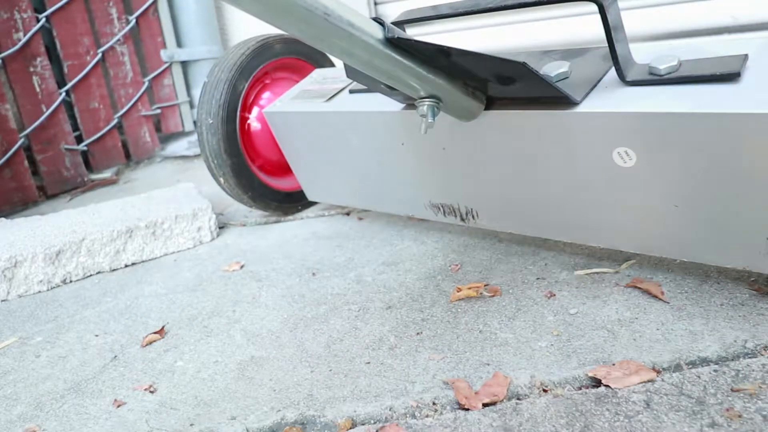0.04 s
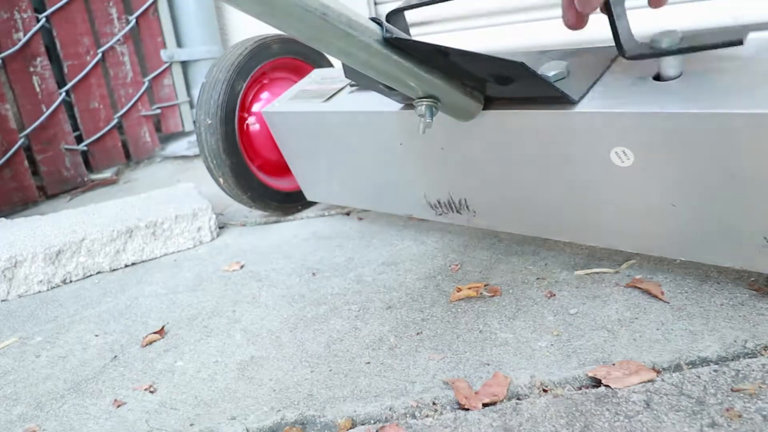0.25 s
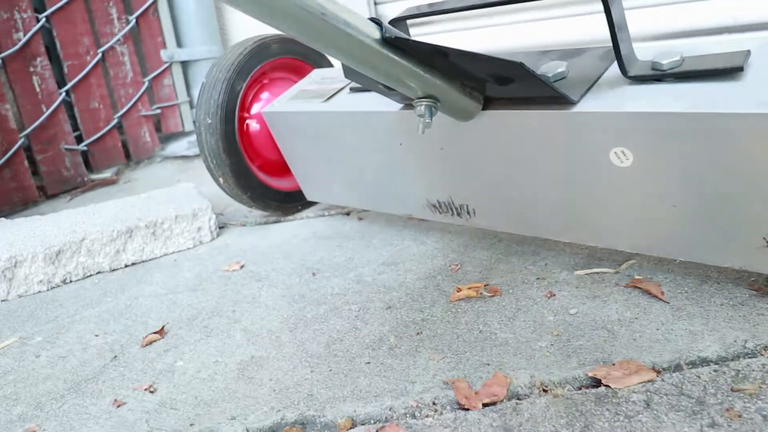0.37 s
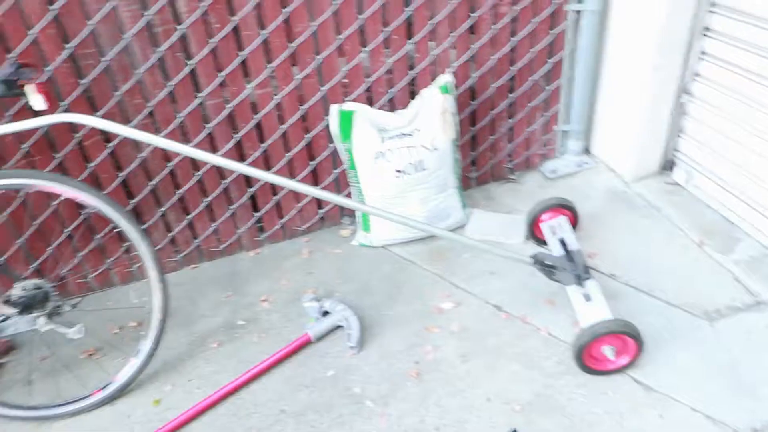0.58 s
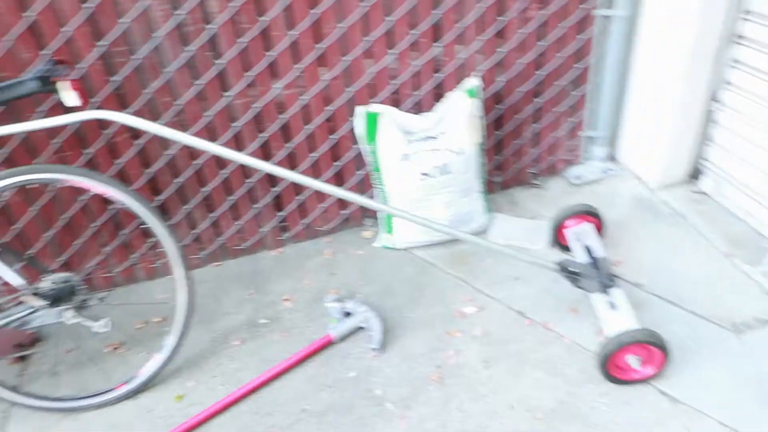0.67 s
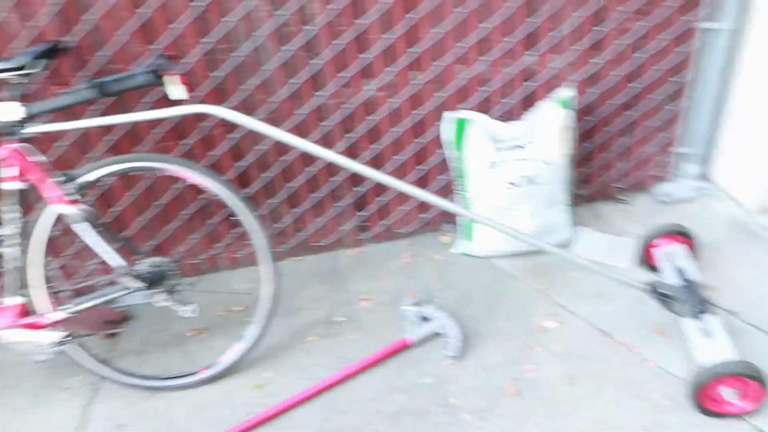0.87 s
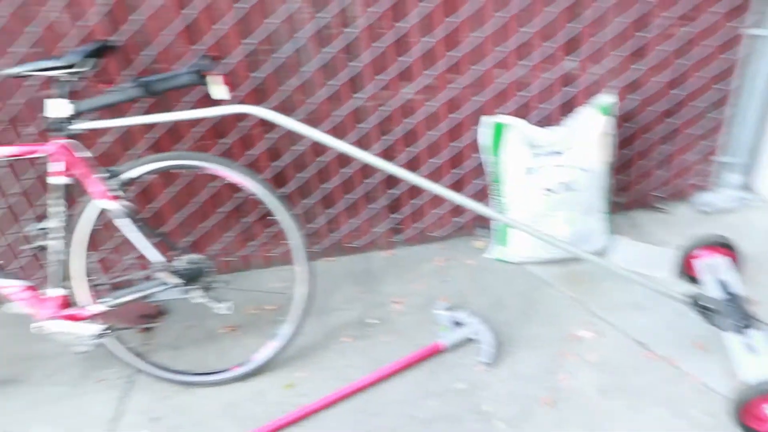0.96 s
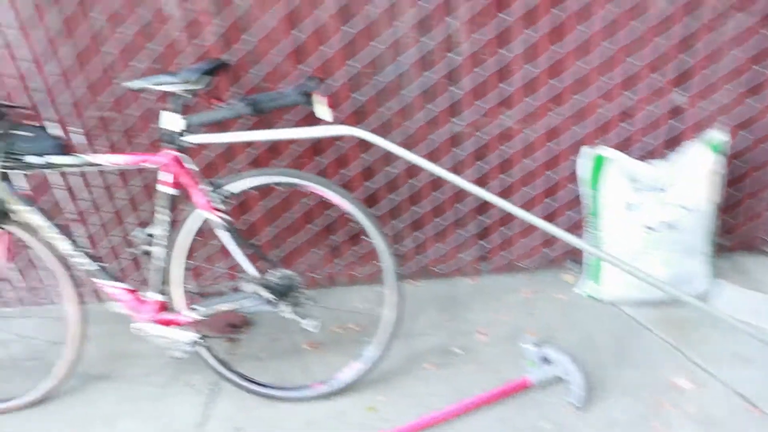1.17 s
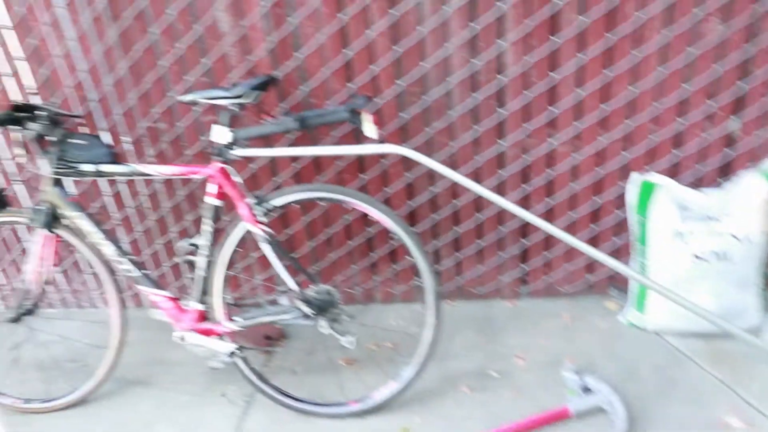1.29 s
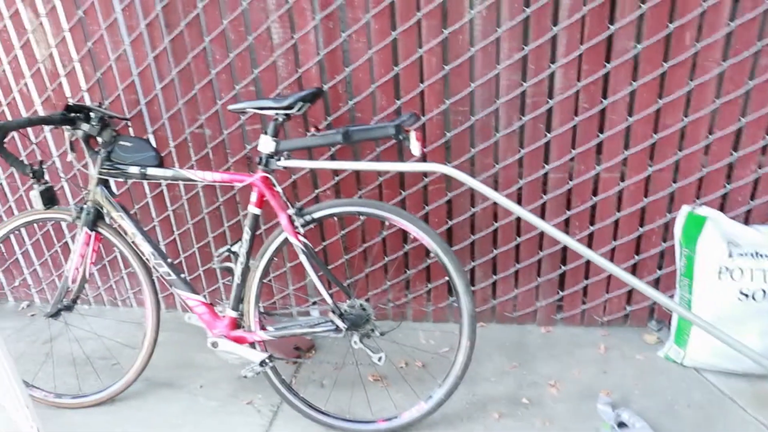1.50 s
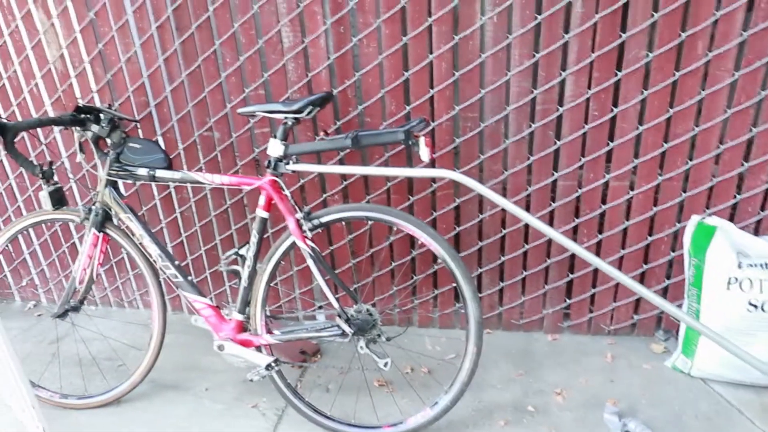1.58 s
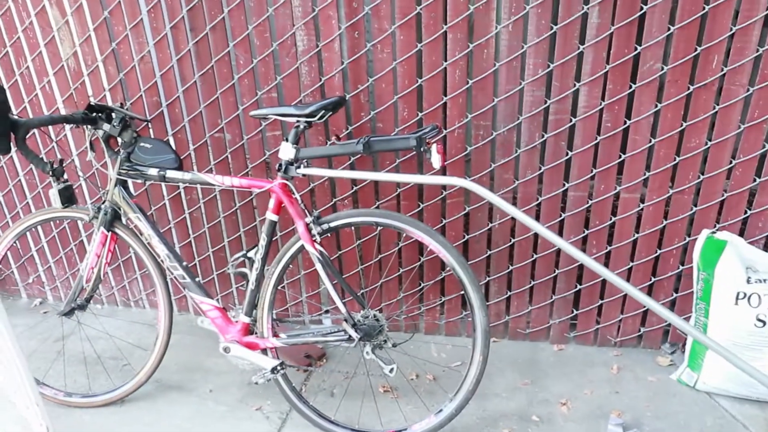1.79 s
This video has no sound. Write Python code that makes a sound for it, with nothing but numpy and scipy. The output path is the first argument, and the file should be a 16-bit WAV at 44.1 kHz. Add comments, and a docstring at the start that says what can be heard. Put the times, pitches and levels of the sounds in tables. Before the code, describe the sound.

A wheeled sweeper's metal handle clacks hard, close by in a paved yard, after light ticks and a steel rub. Its rod squeaks briefly and settles with a softer knock, then distant traffic rumbles low.

```python
"""Light ticks and a rub of steel, then a hard clack: a wheeled sweeper's release handle, close by on a paved
yard. Its rod squeaks as it slides, ticks and settles with a softer knock. The blows ring the steel of handle
and housing; the squeak is stick and slip. The background level dips after the clack; at 0.53 s a click sounds
and the background switches abruptly to the steady, low rumble of distant traffic."""
import sys
import numpy as np
from scipy import signal
from scipy.fft import rfft, irfft
from scipy.io import wavfile

SR = 44100
rng = np.random.default_rng(int(sys.argv[2]) if len(sys.argv) > 2 else 0)


def waveform_to_disk(signal):
    """Save audio, clipped to [-1, 1], as 16-bit WAV at the path in sys.argv[1]."""
    frames = np.transpose(np.atleast_2d(signal))
    scaled = np.clip(frames, -1, 1) * 32767
    samples = np.round(scaled).astype(np.int16)
    wavfile.write(sys.argv[1], SR, samples)


N = 81585
T = np.arange(N) / SR
TRAFFIC_START_S = .533
# Bright colour of light steel contact. Each row: frequency in Hz, relative level in dB.
BRIGHT_STEEL = [(1000, -29), (7000, -10), (9000, -4), (11000, -6.5), (13500, 3.5), (16000, -9)]


def from_db(db):
    """Decibels to gain."""
    return 10 ** (np.asarray(db) / 20)


def rms_one(x):
    """Scale to unit rms."""
    return x / np.sqrt(np.mean(x ** 2) + 1e-20)


def in_time(rows):
    """Each column of a curve, at every sample."""
    times, *columns = np.transpose(rows)
    return [np.interp(T, times, column) for column in columns]


def noise(spectrum):
    """Steady noise of a given colour, rms 1."""
    hz, db = np.transpose(spectrum)
    bins = np.maximum(np.fft.rfftfreq(N, 1 / SR), 1)
    gain = from_db(np.interp(np.log(bins), np.log(hz), db))
    return rms_one(irfft(rfft(rng.standard_normal(N)) * gain, N))


def narrow_noise(hz, width_hz):
    """Noise in one steep resonance, rms 1."""
    detuning = 2 * (np.fft.rfftfreq(N, 1 / SR) - hz) / width_hz
    return rms_one(irfft(rfft(rng.standard_normal(N)) / (1 + detuning ** 2), N))


def decay(start, t60):
    """Sudden start, exponential fall."""
    return (T >= start) * from_db(-60 * np.clip((T - start) / t60, 0, 4))


def swell(peak, rise, fall):
    """Rises to a peak and falls again, 20 dB in each given time."""
    return from_db(-20 * np.minimum(np.maximum((peak - T) / rise, (T - peak) / fall), 10))


def scatter(x, db, delay_s, t60):
    """A short, dense tail of reflections."""
    tail = rng.standard_normal(N) * decay(delay_s, t60)
    return from_db(db) * signal.fftconvolve(x, tail / np.sqrt(np.sum(tail ** 2)))[:N]


def yard_air():
    """Thin outdoor air with a faint, far hum; their level drops after the clack and partly returns."""
    # Air around the sweeper. Each row: frequency in Hz, relative level in dB.
    colour = [(25, -35), (70, -31), (130, -18.5), (220, -17), (300, -8), (460, -9.5), (590, -4.5),
              (670, -7.5), (800, -3.5), (1300, -12), (1800, -7.5), (2150, -14), (8300, -23.5), (16000, -33)]
    # Its dip and partial return. Each row: time in seconds, level in dB.
    level = [(0, -37.5), (.21, -36.5), (.228, -40), (.245, -58), (.27, -63), (.33, -66.5), (.40, -60),
             (.46, -58), (.53, -53.5)]
    hum = from_db(-10.5) * np.sqrt(2) * np.sin(2 * np.pi * 613 * T)
    return from_db(in_time(level)[0]) * (noise(colour) + hum)


def rod_ticks():
    """The loose rod ticks, tiny and bright."""
    # Taps of the rod. Each row: start in seconds, level in dB.
    taps = [(0.0162, -24.5), (0.027, -36)]
    return noise(BRIGHT_STEEL) * sum(from_db(db) * decay(start, t60=.019) for start, db in taps)


def steel_rubs():
    """Steel sliding on steel hisses and sings at one high resonance; the first rub fizzes at its height."""
    # Slides. Each row: peak time in seconds, level in dB, rise and fall in seconds, singing in relative dB.
    slides = [(.186, -39.5, 0.056, 0.029, 6.5), (.303, -43, .06, 0.0083, -27),
              (.348, -30, 0.0077, 0.013, -12.5), (1.505, -52, .03, .05, -22)]
    # Friction hiss. Each row: frequency in Hz, relative level in dB.
    colour = [(150, -51.5), (500, -26.5), (1300, -9.5), (2000, -15.5), (2700, 3.5), (3700, -4.5),
              (4700, -2), (6400, -5), (9000, -20.5), (15000, -19.5)]
    hiss, singing = noise(colour), narrow_noise(8000, width_hz=700)
    rubbing = sum(from_db(db) * swell(peak, rise, fall) * (hiss + from_db(singing_db) * singing)
                  for peak, db, rise, fall, singing_db in slides)
    fizz = from_db(-31) * swell(peak=.183, rise=.018, fall=.018) * noise(BRIGHT_STEEL)
    return rubbing + fizz


def handle_blows():
    """Each blow rings the steel under a gritty crack; where and how hard it lands sets its colour. The click at
    0.53 s, as the background switches, is made the same way."""
    # Blows, and last the click at 0.53 s. Each row: start in seconds, gain in dB, contact softness as a low-
    # pass in Hz, grit in dB, pitch favoured by the point of contact in Hz, gain of that added band in dB.
    blows = [(0.2128, -13, 3000, -1, 2600, -2), (.2220, 0.5, 13100, -3.5, 1470, -1),
             (0.224, -20, 12000, -4, 6000, 4), (0.2808, -33.5, 14000, -1, 4860, 14),
             (0.3466, -36, 9000, 7, 3200, 10), (0.3488, -28.5, 3000, -6, 3070, 12),
             (0.531, -27, 3000, 0, 2750, 9)]
    # Modes of handle and housing. Each row: frequency in Hz, relative level in dB, t60 in seconds.
    modes = [(1360, -8, 0.019), (1610, -15.5, 0.016), (1737, -12, 0.018), (2370, -15.5, 0.013),
             (2576, -18.5, 0.048), (3120, -13.5, 0.027), (3347, -12.5, 0.028), (4953, -7, .016),
             (5310, -10.5, .016), (6170, -10.5, 0.028), (6410, -10.5, 0.017), (8210, -9, .012),
             (10500, -12, 0.0078), (13500, -20, 0.022)]
    # Dense upper ringing. Each row: frequency in Hz, relative level in dB.
    crack_colour = [(100, -31.5), (500, -19), (1000, -17), (1500, 1.5), (4000, 0.5), (6000, 6), (9500, 1),
                    (15000, -8.5)]
    out, crack = np.zeros(N), noise(crack_colour)
    for start, db, soft_hz, grit_db, favoured_hz, boost_db in blows:
        span = slice(int(start * SR), int(start * SR) + SR // 5)
        age = T[:len(T[span])]
        hit = from_db(grit_db) * (crack * decay(start, t60=.018))[span]
        for k, (hz, mode_db, t60) in enumerate(modes):
            strength = (-1) ** k * from_db(mode_db + 2.2 * rng.standard_normal())  # no two contacts alike
            hit += strength * from_db(-60 * age / t60) * np.sin(2 * np.pi * hz * age)
        hit += from_db(boost_db) * signal.lfilter(*signal.iirpeak(favoured_hz, Q=3.7, fs=SR), hit)
        out[span] += from_db(db) * signal.lfilter(*signal.butter(1, soft_hz, fs=SR), hit)
    return signal.lfilter(*signal.butter(2, 310, "high", fs=SR), out)


def rod_squeak():
    """Stick and slip: a falling whistle that turns to rough overtones and scrape as the rod slows."""
    # The whistle's glide. Each row: time in seconds, pitch in Hz.
    glide = [(.231, 5425), (.237, 4996), (.243, 4890), (.247, 4790), (.251, 4620), (.254, 4420),
             (.258, 4680), (.266, 4570)]
    # Its loudness. Each row: time in seconds, whistle level in dB, rasp level in dB.
    levels = [(.2295, -46, -56.5), (.232, -7, -36.5), (.242, -9, -27.5), (.248, -15.5, -28.5),
              (.252, -19, -32.5), (.254, -30.5, -32), (.259, -22.5, -31), (.265, -49, -51.5),
              (.280, -48, -74)]
    # The rod's scrape. Each row: frequency in Hz, relative level in dB.
    scrape_colour = [(1000, -34), (2800, -8), (3800, -13.5), (6200, 2.5), (8000, -1), (12000, -5),
                     (15000, -2)]
    hz, = in_time(glide)
    whistle_db, rasp_db = in_time(levels)
    sliding = (T > levels[0][0]) & (T < levels[-1][0])
    jitter = .007 * narrow_noise(0, width_hz=900)
    flutter_db = .5 * narrow_noise(0, width_hz=700)
    phase = 2 * np.pi * np.cumsum(hz * (1 + jitter)) / SR
    whistle = sliding * from_db(whistle_db + flutter_db) * np.sqrt(2) * np.sin(phase)
    overtones = np.sqrt(2) * (np.sin(2 * phase) + from_db(-2) * np.sin(3 * phase))
    rasp = sliding * from_db(rasp_db) * (overtones + from_db(-.5) * noise(scrape_colour))
    housing = scatter(rasp, db=-4.5, delay_s=0, t60=.03)
    return whistle + rasp + housing


def distant_traffic():
    """Traffic far from the yard: a steady, low rumble with three drones that slowly swell or fade."""
    # The rumble. Each row: frequency in Hz, relative level in dB.
    colour = [(15, -39), (25, -7.5), (49, -8.5), (114, -0.5), (277, -4), (317, -5.5), (363, -6.5),
              (416, -8), (591, -11), (754, -13.5), (840, -12.5), (1070, -13), (2840, -27.5), (6560, -31),
              (9840, -38.5), (14800, -45.5), (16000, -47)]
    # Its slight drift. Each row: time in seconds, level in dB.
    level = [(.54, -36), (.8, -37.5), (1.3, -37), (1.6, -36), (1.85, -36.5)]
    # Traffic drones. Each row: frequency in Hz, first level in dB, last level in dB.
    drones = [(117.1, -50.5, -49), (160, -64, -40), (361.5, -43, -52.5)]
    rumble = from_db(in_time(level)[0]) * noise(colour)
    for hz, first_db, last_db in drones:
        drone_db = np.interp(T, [TRAFFIC_START_S, T[-1]], [first_db, last_db])
        rumble += from_db(drone_db) * narrow_noise(hz, width_hz=17.4)
    return rumble


def scene():
    """The handle up close, faintly scattered by paving and fence, over outdoor air, then, from 0.53 s, distant
    traffic."""
    handle = rod_ticks() + steel_rubs() + handle_blows() + rod_squeak()
    reflections = scatter(handle, db=-34.5, delay_s=.0049, t60=.16)
    traffic_share = np.clip((T - TRAFFIC_START_S) / .01, 0, 1)
    background = (1 - traffic_share) * yard_air() + traffic_share * distant_traffic()
    return (handle + reflections + background)[None]


def record(dry):
    """The clack overloads the close microphone; the top is cut at 15.9 kHz."""
    overloaded = np.clip(dry, -.95, .95)
    return signal.sosfilt(signal.ellip(10, .1, 80, 15900, fs=SR, output="sos"), overloaded)


dry = scene()
out = record(dry)
waveform_to_disk(out)
```